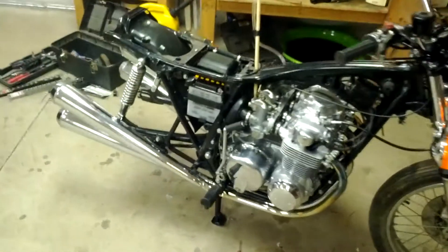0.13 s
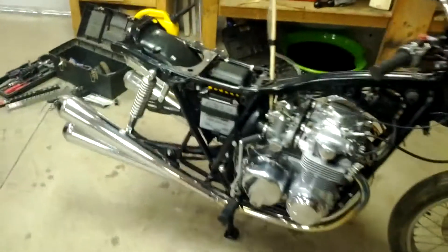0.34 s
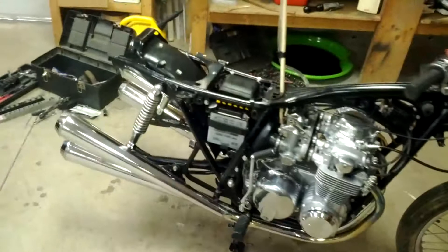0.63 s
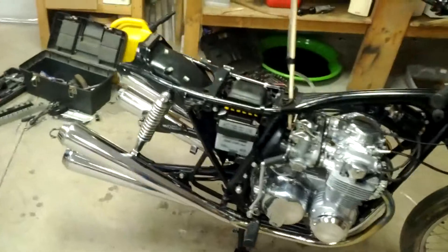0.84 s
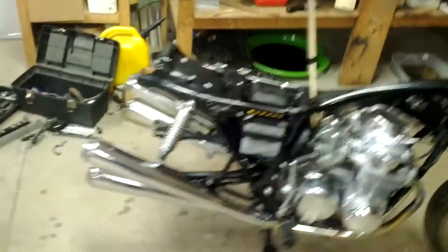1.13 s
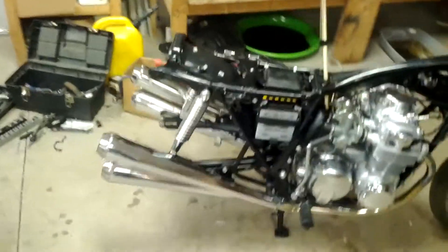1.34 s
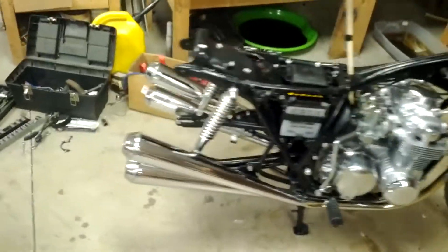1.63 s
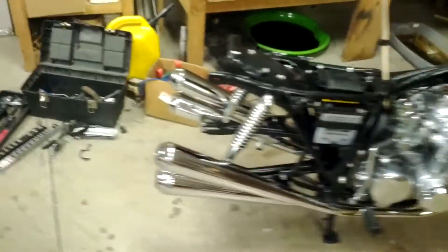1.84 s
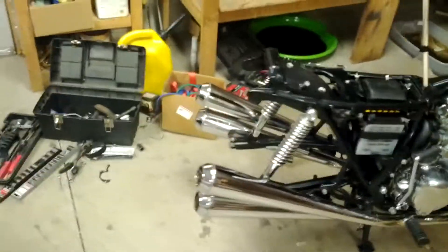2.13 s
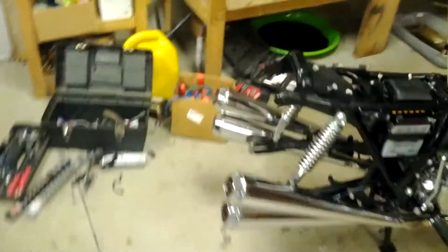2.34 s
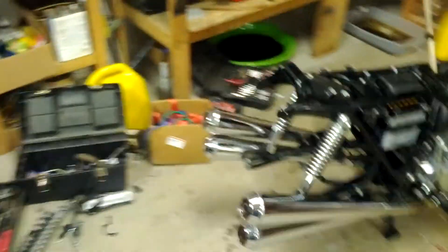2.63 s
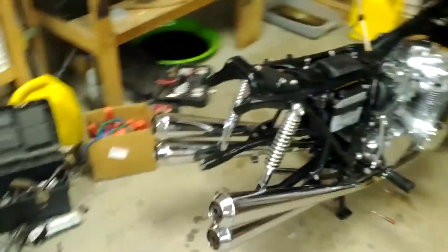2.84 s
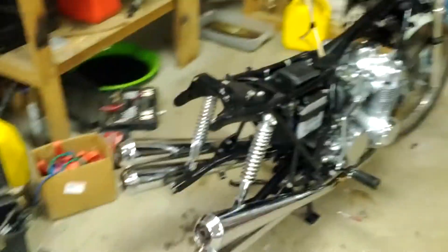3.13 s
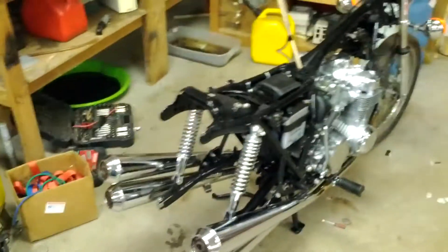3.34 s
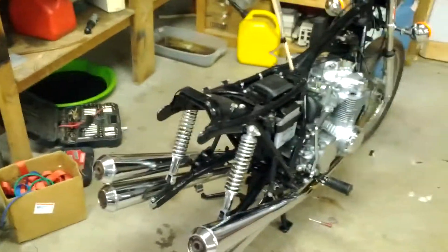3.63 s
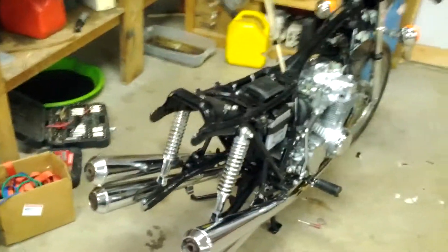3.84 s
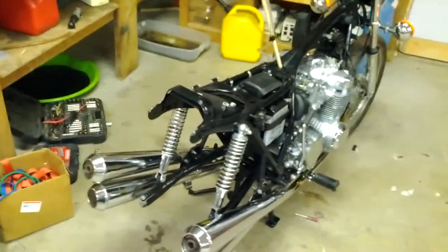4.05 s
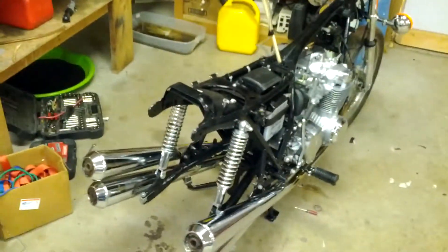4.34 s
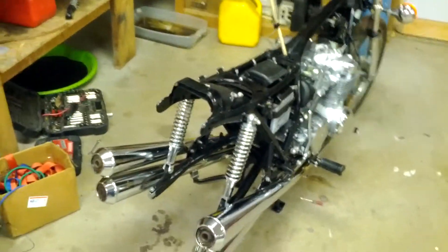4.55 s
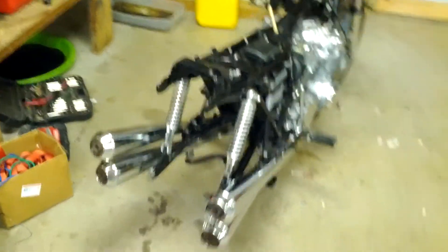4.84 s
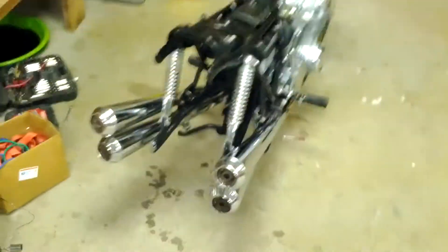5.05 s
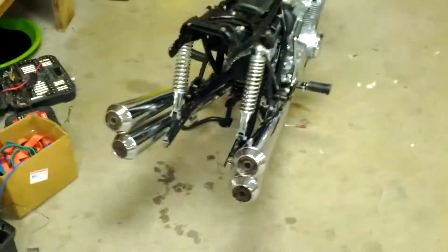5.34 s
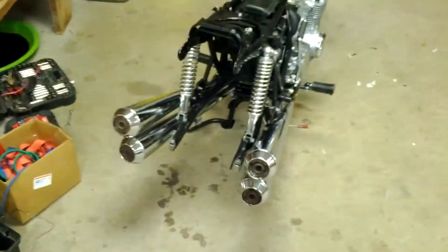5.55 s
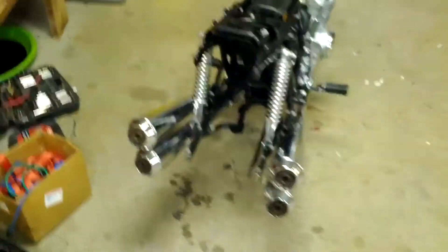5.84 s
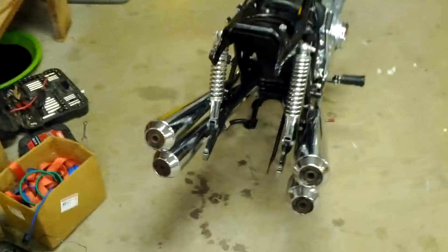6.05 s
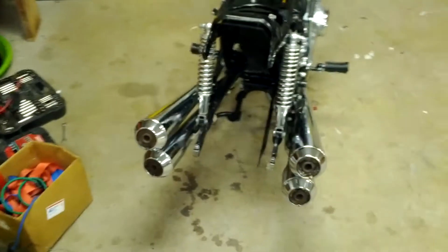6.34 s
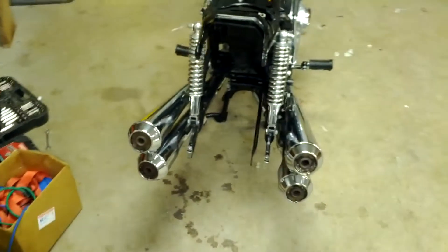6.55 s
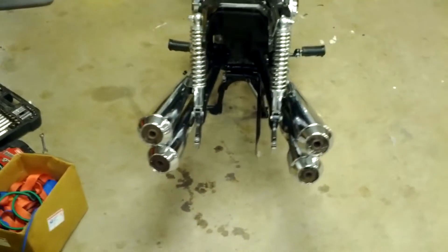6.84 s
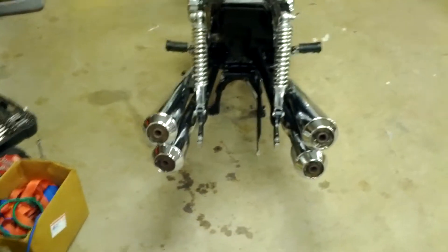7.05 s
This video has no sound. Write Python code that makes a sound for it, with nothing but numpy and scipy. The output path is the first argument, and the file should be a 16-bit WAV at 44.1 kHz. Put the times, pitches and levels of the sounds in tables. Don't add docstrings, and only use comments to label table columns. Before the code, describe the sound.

An air-cooled four-cylinder motorbike idles continuously in a small garage. Quick, slightly uneven exhaust pulses boom low and bark at the pipe ends, while gears and chain clatter and gas hisses. A handheld phone moves from beside the engine to behind the tail; the mechanical treble recedes and the spitting exhaust becomes more pronounced. A tiny hard double snap occurs at about two seconds. The hard walls give a short echo.

```python
import sys
import numpy as np
from scipy import signal
from scipy.io import wavfile
from scipy.ndimage import uniform_filter1d

SR = 44100
rng = np.random.default_rng(int(sys.argv[2]) if len(sys.argv) > 2 else 0)


def elevation(decibels):
    levels = np.asarray(decibels, float)
    return 10 ** (levels / 20)


def generate_wav(signal):
    frames = np.transpose(np.atleast_2d(signal))
    scaled = np.clip(frames, -1, 1) * 32767
    pcm = np.round(scaled).astype(np.int16)
    wavfile.write(sys.argv[1], SR, pcm)


N = 317079
T = np.arange(N) / SR


def level(x, db):
    return x * elevation(db) / np.sqrt(np.mean(x ** 2))


def ring(x, hz, width):
    decay = np.exp(-np.pi * width / SR)
    step = 2 * np.pi * hz / SR
    return signal.lfilter([0, decay * np.sin(step)], [1, -2 * decay * np.cos(step), decay ** 2], x)


def body(x, modes):
    out = np.zeros(N)
    for k, (hz, width, db) in enumerate(modes):
        gain = elevation(db) * 2 * np.pi * width / SR
        out += (-1) ** k * gain * ring(x, hz, width)
    return out


def band(x, lo_hz, hi_hz):
    return signal.sosfilt(signal.butter(3, [lo_hz, hi_hz], "band", fs=SR, output="sos"), x)


def noise():
    return rng.standard_normal(N)


def curves(table):
    s, *columns = np.transpose(table)
    return [np.interp(T, s, c) for c in columns]


def wander(rate, db):
    aims = rng.standard_normal(int(N / SR * rate) + 2)
    return elevation(db * np.interp(T * rate, np.arange(len(aims)), aims))


# (time [s], engine block in view [dB], pipe mouths near [dB], spit aimed at phone [dB])
WALK = [(0, 1, -3.5, -5), (.3, -0.5, -0.5, -5.5), (1.3, 0.5, 0, -5), (2.05, .5, 1.5, -3),
        (2.5, -3.5, 0.5, -4.5), (2.9, -5, -3.5, 1), (3.7, -5, -0.5, 0), (5.0, -5, .5, 1.5),
        (5.6, -4.5, -1, 2.5), (6.0, -4, -0.5, 6), (6.7, -3, 0, 4.5), (7.19, -3, -0.5, 6)]


def walk():
    return curves(WALK)


# (time [s], four-stroke cycles a second [Hz])
SPEED = [(0.0, 11.133), (0.8, 10.444), (1.54, 10.782), (1.73, 10.308), (2.34, 10.802), (2.53, 10.627),
         (2.85, 9.779), (3.49, 10.373), (3.62, 10.128), (4.19, 10.21), (4.33, 10.631), (4.6, 10.057),
         (4.93, 10.72), (5.18, 9.857), (6.08, 9.981), (6.22, 9.566), (6.47, 10.43), (7.19, 10.349)]


def engine_turn():
    start_turn = -.21
    return start_turn + np.cumsum(curves(SPEED)[0]) / SR


FIRING_TURN = [.311, .561, .808, 1.061]


def firings(turn, scatter_db, jitter_s, lead=0):
    cycle = np.arange(-1, 76)
    trains = np.zeros((4, N))
    for train, at in zip(trains, np.subtract(FIRING_TURN, lead)):
        late, strength = rng.standard_normal((2, len(cycle)))
        on_time = np.interp(cycle + at, turn, np.arange(N), left=-SR, right=-SR)
        i = (on_time + jitter_s * SR * late).astype(int)
        inside = (i >= 0) & (i < N)
        train[i[inside]] = elevation(scatter_db * strength)[inside]
    return trains


def puff(trains, share_db, rise_s, fall_s):
    s = np.arange(SR // 10) / SR
    shape = (1 - np.exp(-s / rise_s)) ** 2 * np.exp(-s / fall_s)
    return signal.fftconvolve(elevation(np.array(share_db)) @ trains, shape / shape.max())[:N]


def pipes(trains, modes):
    behind = np.interp(T, [.3, 3.3], [0, 1])
    beside_sound = sum(ring(np.dot(m[2:6], trains), *m[:2]) for m in modes)
    behind_sound = sum(ring(np.dot(m[6:], trains), *m[:2]) for m in modes)
    return (1 - behind) * beside_sound + behind * behind_sound


def garage_echo(x):
    s = np.arange(SR // 4) / SR
    tail = noise()[:SR // 4] * elevation(-60 * s / 0.19)
    return signal.fftconvolve(x, tail / np.sqrt(np.sum(tail ** 2)))[:N]


# (time [s], swing [dB], frequency [Hz], width [Hz])
SNAP = [
    (2.2066, -11, 2500, 600),
    (2.2063, -12, 5500, 900),
    (2.2110, 0, 4600, 1300),
    (2.2111, -12, 2800, 900),
]


def snap():
    out = np.zeros(N)
    for s, db, hz, width in SNAP:
        click = 1. * (np.arange(N) == int(s * SR))
        out += elevation(db) * ring(click, hz, width)
    return out


# (time [s], covers buzz up [dB], low fin up [dB], high fin up [dB])
JOLTS = [(0.01, 13, 10, 16), (0.35, 1, -5, 12), (0.55, 5, -2, 1), (0.94, 3.5, 7, 6), (1.12, 4, 1, 9),
         (1.33, 2, -4, 14), (1.88, 4, 4, 5), (1.98, 4, 1, 10), (2.10, 4, 4, 5.5), (2.33, -1, -1, 15),
         (2.43, 3, 5, 9), (2.55, 2, 7, 16.5), (2.77, 2, 6, 11), (2.94, 4, 1, -1), (3.13, 6, -1, 4),
         (3.34, 3, 7, 9), (3.63, 3.5, 5, -12), (4.12, 3.5, 9, 5), (4.71, 2.5, 4, -4), (5.20, 1.5, 9, 0),
         (5.40, 1.5, 9, 11), (5.51, 5, 8, 7), (5.69, 5, 10, 11), (5.81, 3.5, 8, -1), (5.91, 1.5, 10.5, -5),
         (6.01, -0.5, 2, 2), (6.22, 2.5, 11, 9), (6.41, 3, 2, 8.5), (6.52, 3.5, 1, 5), (6.78, 2, 4, -4)]
# (level [dB]), then (random drift [dB])
REST_DB = [-36, -47, -46.5]
RESTLESS_DB = [1.0, 3, 4.5]


def shaken():
    jolt_s = .03
    view_db, _, spit_db = walk()
    jolts = np.array(JOLTS)
    swells = np.exp(-((T - jolts[:, :1]) / jolt_s) ** 2 / 2)
    lift = jolts[:, 1:].T @ swells
    levels = []
    for rest, up, restless in zip(REST_DB, lift, RESTLESS_DB):
        drift_db = 20 * np.log10(wander(10, restless))
        levels.append(rest + up + 0.21 * view_db + .3 * spit_db + drift_db)
    return levels


RATTLE_DB = [-12, -3, -2, 0]
# (frequency [Hz], width [Hz], level [dB])
BUZZ = [(477, 89, -5), (748, 210, 0), (1150, 880, -2), (1747, 820, -4)]
# (frequency [Hz], width [Hz])
FINS = [(980, 81), (1415, 43)]


def rattle(turn, buzz_db, *fin_db):
    trains = firings(turn + .07, scatter_db=1.5, jitter_s=.002)
    shake = .7 + puff(trains, RATTLE_DB, rise_s=.003, fall_s=.016)
    out = elevation(buzz_db - 1.5) * level(body(noise() * shake, BUZZ), 0)
    for db, (hz, width) in zip(fin_db, FINS):
        db = db - .8 * np.clip(-44 - db, 0, None)
        once = ring(noise() * shake, hz, width * 0.95)
        out += elevation(db) * level(ring(once, hz, width * 0.95), 0)
    return out


def gas(turn, trains, share_db, modes, spit_db, fall_s):
    swell_db = 1.3 * np.cos(2 * np.pi * (turn - .87)) + .7 * np.cos(4 * np.pi * (turn - .06))
    swell = elevation(swell_db) * wander(6, 1.1)
    grain = elevation(1.3 * rng.exponential(size=N))
    spit = elevation(spit_db + walk()[2]) * puff(trains, share_db, 0.0021, fall_s)
    rough = level(noise() * grain, 0) * np.hypot(swell, spit)
    return level(body(rough, modes), 0)


TOP_SPIT_DB = [-13, 0, -6, -7]
# (frequency [Hz], width [Hz], level [dB])
TOP = [(13300, 4700, 7), (15500, 1200, 1)]


def fizz(turn, trains):
    return band(gas(turn, trains, TOP_SPIT_DB, TOP, spit_db=9.1, fall_s=0.0043), 10400, 15800)


HIGH_SPIT_DB = [-8, 0, -.5, -1]
# (frequency [Hz], width [Hz], level [dB])
HISS = [(7160, 1220, -6), (8290, 870, 3), (9840, 3700, -1), (12330, 910, -0.5)]


def hiss(turn, trains):
    return gas(turn, trains, HIGH_SPIT_DB, HISS, spit_db=5.7, fall_s=0.0026)


LOW_SPIT_DB = [-9, -2, 0, -3]
# (frequency [Hz], width [Hz], level [dB])
CLATTER = [(1880, 830, 1.5), (3610, 4100, 3.5), (4710, 1260, 7), (5870, 890, -1.5)]


def clatter(turn, trains):
    return gas(turn, trains, LOW_SPIT_DB, CLATTER, spit_db=1.3, fall_s=0.0021)


SPIT_LEAD_TURN = [.062, .062, .062, .085]


def spits(turn):
    return firings(turn, scatter_db=1.3, jitter_s=.0008, lead=SPIT_LEAD_TURN)


BARK_DB = [-9, -9, 0, -2]
# (frequency [Hz], width [Hz], level [dB])
RUSH = [(164, 39, 3), (228.5, 26, 3), (247, 17, 4.5), (313.5, 89, -2), (374, 68, 1), (475, 166, -8.5)]
# (frequency [Hz], width [Hz], four signed swings by cylinder 1-4 beside the bike,
# four behind it)
BARK = [(187, 18, 0, 7, 6, -4, 6, -5, 4, 1), (214, 18, -8, 6, 22, 34, 8, 13, -9, 12),
        (246, 26, 3, 0, -16, -8, -5, 4, -20, -10), (290, 28, 4, -7, 35, -4, 9, 4, 46, 25),
        (316, 25, -8, 6, -36, -13, -7, 3, -34, 1), (362, 22, 1, -3, -13, -7, -2, 0, -15, 3),
        (420, 30, -5, -2, -13, 5, 3, 2, -17, -6)]


def bark(turn):
    trains = firings(turn + .063, scatter_db=1.5, jitter_s=.0003)
    sweep_s = 0.0204
    s = np.arange(int(sweep_s * SR)) / SR
    whoop = signal.chirp(s, 477.3, sweep_s, 165) * np.sin(np.pi * s / sweep_s) ** .5
    early = int(.013 * SR)
    slugs = signal.fftconvolve(trains, whoop[None])[:, early:][:, :N]
    knock = level(band(pipes(slugs, BARK), 215, 680), 0)
    flow = 1.2 + puff(trains, BARK_DB, rise_s=0.0032, fall_s=0.0059)
    rush = band(body(noise() * flow, RUSH), 153, 503)
    return level(knock + level(rush, -1.5), 0)


# (frequency [Hz], width [Hz], four signed swings by cylinder 1-4
BOOM = [(39.0, 6.2, 0.017, 0.02, -0.004, -0.025, 0.023, 0.027, 0.019, -0.039),
        (56.8, 5.4, -0.043, -0.054, -0.041, -0.009, 0.012, -0.006, 0.019, 0.088),
        (81.9, 5.0, -0.01, 0.032, 0.056, -0.039, 0.07, 0.003, -0.025, -0.058),
        (103.8, 7.0, -0.018, 0.006, 0.105, 0.133, -0.182, -0.133, 0.003, -0.048),
        (115.2, 12.0, 0.178, 0.108, 0.049, 0.155, 0.209, 0.26, 0.16, 0.351),
        (141.8, 7.5, 0.001, -0.01, 0.004, 0.01, -0.081, -0.078, -0.092, -0.096)]


def boom(turn):
    low = pipes(firings(turn, scatter_db=.8, jitter_s=.0001), BOOM)
    return signal.sosfiltfilt(signal.butter(5, [26, 170], "band", fs=SR, output="sos"), low)


def scene():
    turn = engine_turn()
    view_db, near_db, spit_db = walk()
    astern = np.interp(T, (5.4, 5.2), [0, 1])
    trains = spits(turn)
    near_side = trains * elevation(-3.5 * np.outer([0, 0, 1, 1], astern))
    shake_db = shaken()
    jolt_db = 0.25 * (shake_db[0] - uniform_filter1d(shake_db[0], size=SR // 2))
    clatter_db = -31.5 + 0.77 * view_db + 0.7 * astern + jolt_db
    upper = snap() + rattle(turn, *shake_db)
    upper += elevation(-30 + view_db - 4 * astern) * fizz(turn, near_side)
    upper += elevation(-27.5 + view_db) * hiss(turn, (trains + near_side) / 2)
    upper += elevation(clatter_db) * clatter(turn, near_side)
    upper += elevation(-32 + near_db) * bark(turn)
    low = elevation(2 + 0.1 * near_db - .15 * spit_db) * boom(turn)
    return (low + upper + elevation(-12.0) * garage_echo(upper))[None]


def roll_off(x):
    return signal.sosfilt(signal.butter(12, 16780, fs=SR, output="sos"), x)


def record(dry):
    top_cut = signal.ellip(10, .3, 60, 15800, fs=SR, output="sos")
    mix = signal.sosfilt(top_cut, dry)
    return roll_off(mix)


dry = scene()
out = record(dry)
generate_wav(out)
```